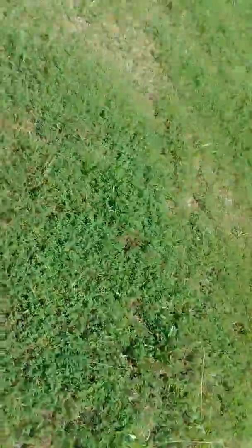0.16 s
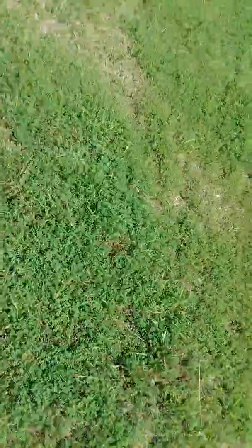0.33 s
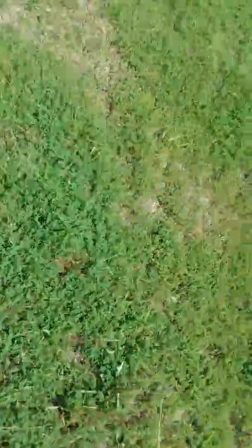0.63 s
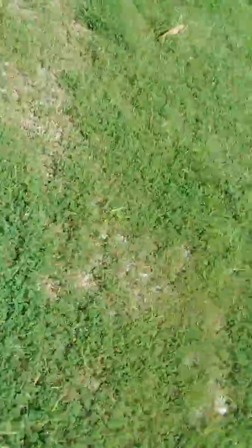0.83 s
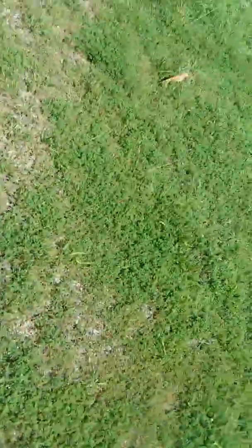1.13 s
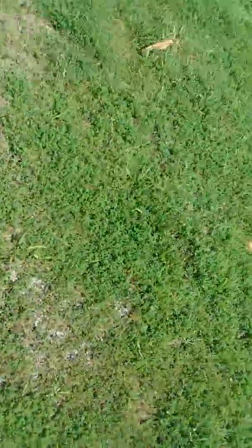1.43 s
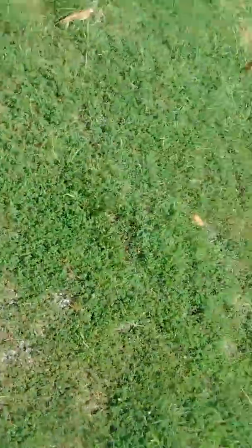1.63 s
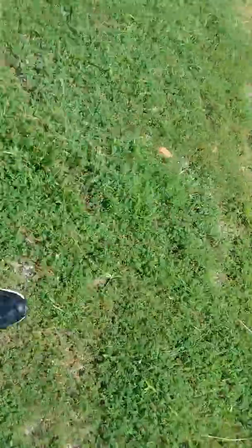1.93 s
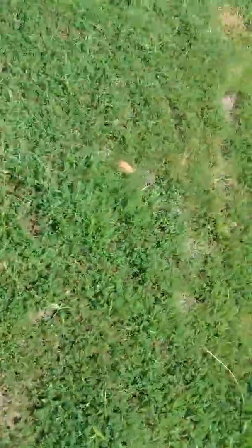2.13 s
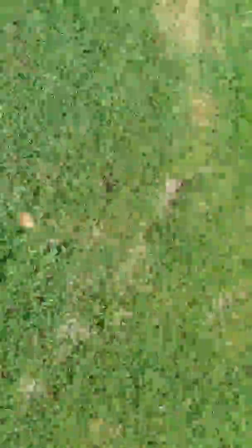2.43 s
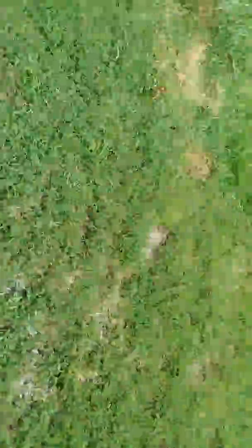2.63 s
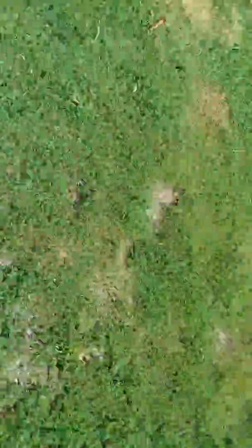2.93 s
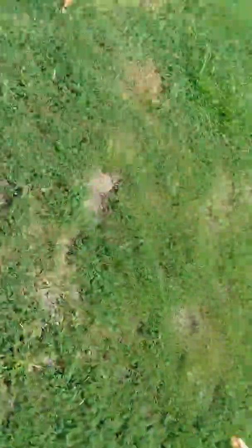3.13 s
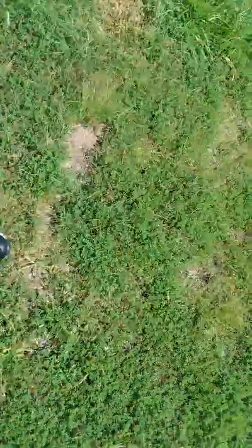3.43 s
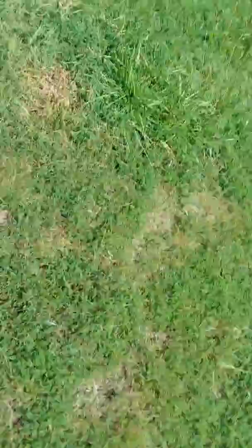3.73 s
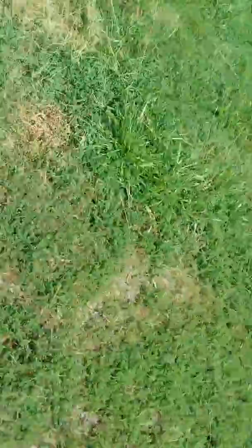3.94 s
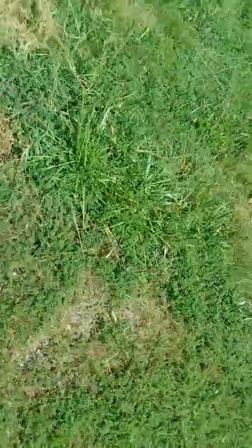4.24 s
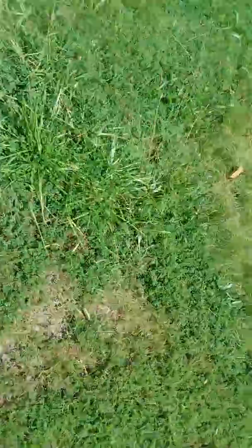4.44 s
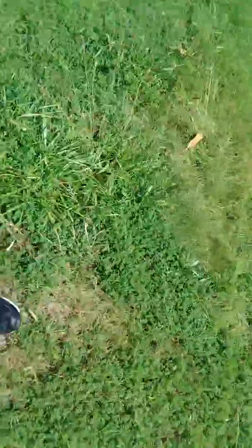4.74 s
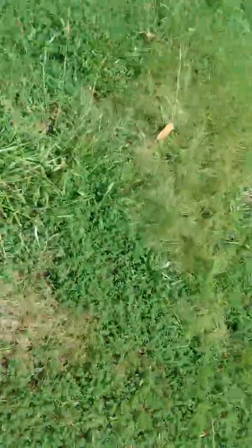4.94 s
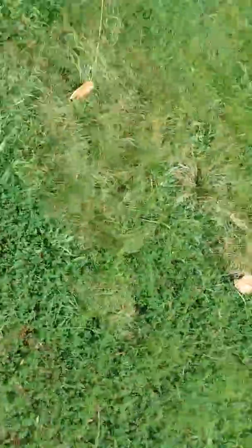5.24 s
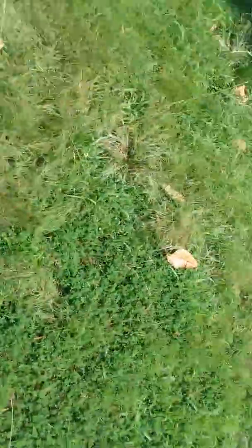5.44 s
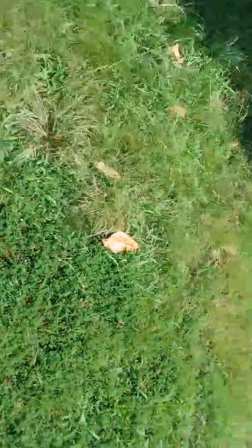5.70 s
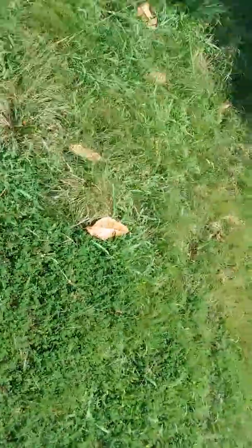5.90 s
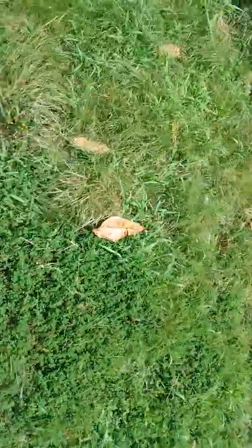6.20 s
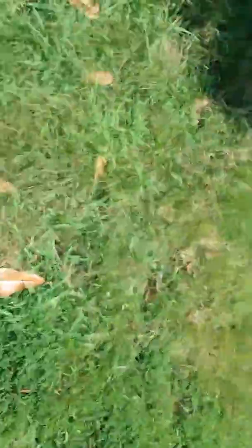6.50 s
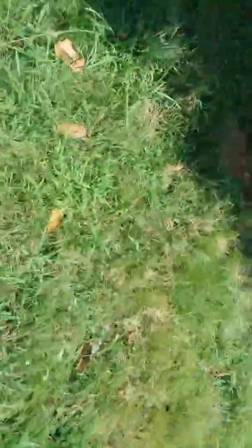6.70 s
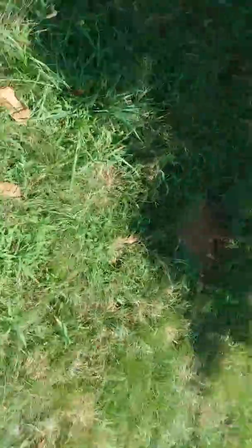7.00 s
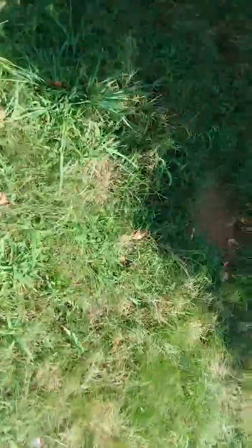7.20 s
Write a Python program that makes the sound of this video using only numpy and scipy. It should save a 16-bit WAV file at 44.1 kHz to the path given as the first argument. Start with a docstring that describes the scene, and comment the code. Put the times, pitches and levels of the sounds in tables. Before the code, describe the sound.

Outdoors on a lawn, slow footsteps crush turf and swish through blades, with small stem snaps. A near songbird on the right starts with buzzy chirps, then sings quick slurred motifs; a farther bird repeats short falling whistles. Very high insects trill throughout, and one rasps near the end. Soft bumps and low wind puffs hit the handheld microphone, mostly on the right.

```python
"""A soft bump and a puff of air rumble on a hand-held camera's microphone ports, louder on the right.
Slow steps cross a lawn: enveloped noise and fractures form the crush and swish, short pings the snaps.
A near songbird, louder on the right, sings pitch-swept tones; a farther one whistles falling notes.
Very high insects trill in pulsed tones over a blurred band of noise; one rasps louder towards the end.
Open air, a faint whine and two thin peeps lie behind."""
import sys
import numpy as np
from scipy import signal
from scipy.fft import rfft, irfft, next_fast_len
from scipy.io import wavfile
from scipy.ndimage import uniform_filter1d, map_coordinates

SR = 44100
rng = np.random.default_rng(int(sys.argv[2]) if len(sys.argv) > 2 else 0)


def transcribe(signal):
    """Save signal, clipped to [-1, 1], as a 16-bit WAV file at the path in sys.argv[1]."""
    frames = np.atleast_2d(signal).T
    limited = np.clip(frames, -1, 1)
    pcm = np.round(limited * 32767).astype(np.int16)
    wavfile.write(sys.argv[1], SR, pcm)


N = 324576

# Levels in the tables are relative: each source adds its own gain.

# open air: freq_hz, density_db_per_hz
AIR_SPECTRUM = [(25, -44), (60, 4.5), (120, 7.5), (250, -2), (500, -17.5), (1400, -20.5), (2300, -11),
                (3000, -13.5), (4200, -22), (6300, -37), (8500, -38), (12500, -30), (15800, -23)]
# steady far insect whine: freq_hz, density_db_per_hz
WHINE_SPECTRUM = [(4600, -18), (5350, -3.5), (5650, 2), (5950, -7.5), (6700, -40)]
# thin calls of a third bird: start_s, length_s, start_hz, middle_hz, end_hz, level_db
PEEPS = [(3.1, .04, 6500, 6150, 5800, -73), (4.327, .06, 4670, 4520, 4150, -70)]
# garden reverberation: freq_hz, t60_s
GARDEN_T60 = [(300, 0.29), (2500, 0.53), (10000, 0.12)]

# insect crowd blur: freq_hz, density_db_per_hz
CHORUS_SPECTRUM = [(8000, -43), (9000, -1), (9600, 1.5), (10200, 2), (10700, 0.5), (11300, -2),
                   (12000, -22)]
# insect crowd level: time_s, level_db
CROWD_LEVEL = [(0, -69.5), (2.3, -69.5), (3, -69.5), (4.5, -72), (5.5, -69.5), (7.36, -73.5)]
# even runs of insect chirps: centre_s (first chirp), count, period_s, pitch_hz, first_db, last_db
CHIRP_RUNS = [(.08, 13, .1885, 11150, -75, -71), (2.748, 5, .1925, 11150, -64, -62),
              (3.711, 5, .1985, 11170, -57, -58.5), (4.7, 13, .208, 11170, -68, -72),
              (.085, 7, .172, 10680, -63, -59), (1.37, 7, .18, 10660, -71, -61),
              (.13, 2, .19, 9500, -65, -62), (1.3, 4, .187, 9400, -68, -67),
              (2.29, 2, .209, 9450, -67, -63), (3.25, 2, .214, 9530, -64, -59),
              (3.78, 3, .18, 9450, -71, -66), (4.329, 2, .233, 9350, -61, -60.5),
              (5.27, 9, .236, 9420, -70, -67)]
# rasping insect: time_s, level_db, pulse_rate_hz
RASP_COURSE = [(0, -100, 15), (5.9, -95, 29), (6.35, -64.5, 27), (6.8, -60, 26), (7.36, -57.5, 18.3)]
# rasping insect's hiss: freq_hz, density_db_per_hz
RASP_SPECTRUM = [(4500, -20), (6300, -6.5), (7600, -5), (8600, -2), (9600, -25), (12000, -34)]

# far bird's whistles: start_s, level_db, pitch_shift_hz
FAR_WHISTLES = [(.01, -62, 86), (1.503, -65, 13), (1.723, -56, -15), (1.97, -56, -55), (2.236, -57, -53),
                (2.481, -57.5, -17), (2.73, -58, -35), (2.969, -55.5, 15), (3.229, -49, -10),
                (3.512, -48, 35), (3.792, -52, -30), (4.056, -50.5, 37), (4.311, -51.5, 35),
                (4.588, -51.5, 44), (4.954, -50.5, 219), (5.228, -53.5, 189)]
FALL_S, FALL_HZ = .052, (2297, 1953, 1736)  # length; start, middle, end pitch before the shift

# near bird's motif notes, seven tables: delay_s, length_s, start_hz, middle_hz, end_hz, level_db
SLUR = [(0, 0.0254, 3120, 2930, 2420, -54)]
LOOP = [(0, .011, 3550, 2950, 2800, -51.5), (.021, 0.023, 2397, 2550, 2870, -42.5),
        (.049, 0.0225, 2377, 2644, 2950, -51.5), (.075, 0.056, 2358, 2240, 2286, -50.5),
        (.122, .046, 2246, 2406, 2420, -40.5)]
HIGH_WHISTLE = [(0, .04, 3122, 3064, 2864, -47), (.028, 0.0615, 3107, 2908, 2750, -42.5)]
DOWN_UP = [(0, 0.012, 3215, 2970, 2800, -57.5), (.023, .02, 2352, 2635, 2870, -50.5)]
TWIRL = [(0, 0.0332, 3185, 2970, 2640, -48.5), (.032, 0.02, 3144, 3410, 3530, -58.5),
         (.061, .031, 2385, 2410, 2520, -50.5), (.097, .022, 3030, 2730, 2528, -49.5)]
SEESAW = [(0, 0.078, 2585, 2701, 2755, -52.5), (.07, .015, 2730, 2500, 2100, -55),
          (.104, .052, 1990, 2076, 2200, -56)]
CURL = [(0, .014, 2340, 2520, 2800, -48.5)]
# motifs, each with its calls: motif, calls of (start_s, first_note_gain_db, last_note_gain_db, pitch_shift_hz)
PHRASES = [(SLUR, [(.917, 2.5, 0, 0)]), (CURL, [(1.913, 0.5, 0, 0)]), (LOOP, [(1.604, -0.5, 3, 14),
           (1.989, 1, 2, -17), (2.394, 0.5, 2, -29.5)]), (HIGH_WHISTLE, [(1.808, -0.5, 0, 13),
           (2.217, -6.5, -4, -9), (2.61, 5, 2, 8.5)]), (DOWN_UP, [(2.885, -2.5, -4.5, 17),
           (3.145, 0.5, -1.5, 3), (3.422, 3, 1, -53), (3.687, -6, -2.5, -22), (3.976, 1.5, -2.5, 50),
           (4.229, -2, -8, -20), (4.507, 1.5, 1.5, 37)]), (TWIRL, [(4.825, 0, 1, 4.3),
           (5.093, 0.5, 0, 14)]), (SEESAW, [(5.385, 0.5, 1, -11), (5.639, -3, 1, -7), (5.877, -1, -4, 5.5),
           (6.141, -0.5, 1.5, -6), (6.92, 6.5, 1.5, 34), (7.173, 10, -1, 21)])]
# chirps tumbling into a buzz: start_s, buzz_delay_s, buzz_length_s, buzz_pitch_hz,
# opening_shift_hz, opening_gain_db, buzz_level_db
BUZZES = [(0.153, 0.041, .044, 2542, 220, -6.5, -42.5), (0.509, 0.044, 0.029, 2204, 63, 0.5, -51),
          (0.779, .044, 0.024, 2360, -4, 1.5, -47.5), (1.041, 0.041, 0.0177, 2330, -60, -3, -45.5),
          (1.331, 0.041, 0.054, 2320, 0, 1, -57.5)]
# notes opening each buzz: delay_s, length_s, start_hz, middle_hz, end_hz, level_db
OPENING = [(0, 0.0147, 3320, 3124, 2860, -50), (.02, .016, 3490, 3283, 3230, -53.5)]
TUMBLE_S, TUMBLE_HZ, TUMBLE_DB = .008, 3290, -47.5  # fall from the opening into the buzz
BUZZ_SAG_HZ, BUZZ_DEPTH_HZ = 149, 312

# gusts on the ports: peak_s, rise_s, fall_s, level_db; rise and fall each span 20 dB
GUSTS = [(.02, 0.07, 0.14, -45), (.3, 0.36, .09, -49), (.665, .2, 0.025, -38.5), (.79, 0.36, 0.26, -43.5),
         (1.06, .06, 0.17, -52), (1.41, 0.11, 0.25, -50), (1.68, 0.17, 0.11, -54), (2.195, 0.11, 0.19, -43),
         (2.41, 0.15, 0.16, -39.5), (2.68, 0.055, 0.099, -52), (3.05, .12, 0.24, -49.5),
         (3.68, 0.092, 0.18, -40), (3.89, 0.072, 0.086, -46.5), (4.12, .12, 0.082, -50.5),
         (4.57, 0.19, .16, -51), (5.24, 0.58, 0.32, -52), (5.62, .3, 0.081, -54), (5.815, 0.05, 0.076, -49),
         (5.96, 0.073, 0.086, -56), (6.35, 0.12, .15, -53), (6.66, .3, .35, -53), (7.15, 0.1, .12, -50)]
# gust rumble: freq_hz, density_db_per_hz
RUMBLE_SPECTRUM = [(20, -58), (35, -23), (55, -2.5), (80, 1), (140, 2), (240, -7.5), (330, -14), (480, -33),
                   (1500, -54)]
# soft bumps on the camera: start_s, pitch_hz, level_db
BUMPS = [(0.034, 96, -27), (0.157, 123, -25.5), (0.649, 204, -16.5), (0.663, 101, -34), (2.277, 184, -27.5),
         (2.364, 91, -36), (2.445, 90, -27), (2.982, 132, -30), (3.635, 85, -29.5), (3.696, 148, -27.5)]

# weight coming onto the turf: peak_s, rise_s, fall_s, level_db; rise and fall each span 20 dB
TREADS = [(.14, 0.079, 0.072, -64), (.303, 0.014, 0.04, -50.5), (.385, 0.076, 0.34, -58),
          (.645, 0.11, 0.06, -50), (.9, 0.35, 0.043, -59.5), (1.175, .17, 0.34, -53.5),
          (1.492, .1, 0.087, -59), (1.795, 0.14, .04, -55.5), (2.08, .042, 0.29, -47.5),
          (2.635, 0.24, 0.18, -52), (2.8, 0.13, 0.067, -55), (3.25, 0.1, 0.13, -49), (3.4, .16, 0.088, -55),
          (3.587, 0.2, .09, -52), (3.79, 0.35, 0.71, -62.5), (4.26, 0.15, 0.16, -52),
          (4.555, .03, .15, -58), (4.888, 0.026, 0.17, -52.5), (4.975, 0.082, 0.31, -54.5),
          (5.435, 0.18, .24, -48.5), (5.645, 0.19, 0.12, -56), (6.025, 0.018, 0.16, -51.5),
          (6.13, 0.087, .45, -54.5), (6.58, 0.1, 0.21, -56.5), (6.82, .22, 0.32, -54),
          (7.03, 0.096, 0.03, -49.5), (7.33, .4, 0.16, -55)]
# crushed turf: freq_hz, density_db_per_hz
TURF_SPECTRUM = [(120, -40), (280, -0.5), (600, 1.5), (1100, -1), (1500, -7.5), (2200, -4), (3200, -18.5),
                 (4500, -17), (9000, -61)]
# breaking stalks: freq_hz, density_db_per_hz
STALK_SPECTRUM = [(300, -25), (800, -4), (1300, -1), (3500, -6), (5000, -20), (9000, -32)]
# heels meeting the soil: start_s, pitch_hz, level_db
HEELS = [(1.501, 307, -40), (3.245, 312, -41), (3.886, 300, -43), (4.552, 317, -34), (4.879, 304, -39),
         (6.382, 327, -36)]
# stems snapping and shoes ticking: start_s, pitch_hz, level_db, pan_left_minus_right_db
SNAPS = [(.1258, 1100, -42, 0), (.3088, 975, -45, -12), (0.6221, 1210, -33.5, -2), (2.0574, 2114, -34, -10),
         (2.1524, 1230, -35, 4), (2.1972, 1110, -38, 7), (2.218, 1170, -46, 7), (2.309, 1200, -39, 4),
         (2.7787, 2550, -37.5, -20), (3.2202, 945, -32, -3), (3.244, 1260, -43, -13),
         (3.3863, 2300, -29, -6), (3.5698, 1700, -37, -8), (3.8902, 1320, -35.5, 2), (4.37, 7000, -45, -9),
         (4.5553, 960, -52, 16), (4.882, 1040, -43, -1), (5.0667, 1070, -37.5, -1), (5.436, 1640, -32, -5),
         (6.1048, 1690, -31.5, -9), (6.1393, 1450, -35.5, 1), (6.206, 686, -35.5, -1),
         (6.2605, 1060, -39, 1.5), (6.3846, 624, -35, 16), (6.8138, 1280, -33.5, -2),
         (7.2928, 880, -32.5, 5.5)]
# shoes sweeping the blades: peak_s, rise_s, fall_s, swish_db, dry_crackle_db; rise and fall span 20 dB
SWEEPS = [(.41, 0.16, 0.28, -63.5, -66.5), (.62, 0.2, 0.11, -67, -70), (.82, 0.063, 0.12, -65, -71),
          (1.09, 0.08, 0.32, -55.5, -59.5), (1.21, 0.16, 0.076, -56, -65), (1.495, 0.12, 0.041, -62, -77),
          (2.1, .14, 0.45, -66, -77), (2.585, .13, 0.25, -50.5, -53.5), (2.79, 0.19, 0.19, -59, -73),
          (3.27, 0.081, .3, -62, -64), (3.39, .04, 0.18, -59.5, -74), (3.568, 0.059, 0.079, -55.5, -62),
          (3.98, 0.21, 0.27, -58.5, -64), (4.09, 0.44, .2, -60.5, -67), (4.24, 0.11, 0.28, -57.5, -67),
          (4.86, 0.3, 0.43, -64.5, -73), (5.12, 0.084, .15, -73, -67), (5.365, 0.063, 0.26, -53.5, -48.5),
          (5.45, 0.2, 0.24, -51, -63), (5.633, .08, 0.29, -57.5, -60), (6.06, 0.15, 0.4, -57.5, -59),
          (6.125, 0.09, 0.26, -55, -61), (6.38, 0.27, 0.65, -62, -67), (6.72, 0.25, 0.12, -64, -61),
          (6.871, 0.32, 0.093, -49.5, -49.5), (7.02, 0.2, 0.17, -53, -56), (7.14, 0.064, 0.65, -61, -61),
          (7.34, 0.77, .2, -58, -67)]
# soft blades: freq_hz, density_db_per_hz
BLADE_SPECTRUM = [(700, -35), (1500, 1), (2700, 11), (4200, 0), (6000, -4), (8500, -1.5), (11000, -25),
                  (13000, -3.5), (16000, -33)]
# dry stems: freq_hz, density_db_per_hz
DRY_STEM_SPECTRUM = [(5000, -5), (9000, -1.5), (11500, -0.5), (13000, -1), (15800, -8.5)]

# relative levels between the swells
SWISH_REST_DB, DRY_REST_DB, CRUSH_REST_DB, GUST_REST_DB = -72, -75.5, -68, -64.5
STALKS_PER_S, STALK_DB = 30, -7  # break rate per channel; gain on the tread curve
TOP_HZ = 15827


def amp(db):
    """Decibels to gain."""
    return 10 ** (np.asarray(db) / 20)


def unit(x):
    """x at rms 1."""
    return x / np.sqrt(np.mean(x ** 2) + 1e-20)


def along(points, hz):
    """(Hz, value) points read on a log-frequency axis."""
    f, v = np.transpose(points)
    return np.interp(np.log(hz + 1), np.log(f + 1), v)


def curves(rows):
    """One value per sample for each column after the time."""
    s, *cols = np.transpose(rows)
    return [np.interp(np.arange(N) / SR, s, c) for c in cols]


def wobble(rate_hz):
    """A smooth random curve through rate_hz knots a second."""
    knots = rng.standard_normal(int(N * rate_hz / SR) + 4)
    return map_coordinates(knots, [np.arange(N) * rate_hz / SR])


def swells(rows, rest_db):
    """Level in dB: power sum of (peak_s, rise_s, fall_s, level_db) swells over a resting level."""
    t = np.arange(0, N, 32) / SR
    power = amp(rest_db) ** 2
    for s, rise_s, fall_s, db in rows:
        drop_db = 20 * np.maximum((s - t) / rise_s, (t - s) / fall_s)
        power = power + amp(db - drop_db) ** 2
    return np.interp(np.arange(N) / SR, t, 10 * np.log10(power))


def filtered(x, response):
    """x times a response of frequency."""
    m = next_fast_len(N + SR // 2)
    return irfft(rfft(x, m) * response(np.fft.rfftfreq(m, 1 / SR)), m)[..., :N]


def add(track, s, sound):
    """Mix a sound into a track at time s."""
    i = max(round(s * SR), 0)
    part = track[..., i:i + sound.shape[-1]]
    part += sound[..., :part.shape[-1]]


def panned(pan_db):
    """Left and right gains of joint rms 1; pan_db is left minus right."""
    return unit(amp([[pan_db / 2], [-pan_db / 2]]))


def ports(x, lead_s):
    """Inter-port delay: left leads right by lead_s; a negative lead puts right first."""
    sides = np.array([[1], [-1]])
    return filtered(x, lambda hz: np.exp(1j * np.pi * hz * lead_s * sides))


def spread(three, spectrum, alike, pan_db):
    """Coloured stereo pair at rms 1, then panned; alike is the power share common to both ears."""
    share = np.clip(alike, 0, 1)
    pair = np.sqrt(share) * three[0] + np.sqrt(1 - share) * three[1:]
    return unit(filtered(pair, lambda hz: amp(along(spectrum, hz)))) * panned(pan_db)


def noise():
    """Three unrelated white noises."""
    return rng.standard_normal((3, N))


def crackle(rate_hz, scatter_db, hiss):
    """Three streams of tiny fractures of uneven size over rubbing noise."""
    sizes = amp(scatter_db * np.clip(noise(), -2, 2)) * np.sign(noise())
    fractures = unit(sizes * (rng.random((3, N)) < rate_hz / SR))
    return fractures + hiss * noise()


def garden(x):
    """Diffuse stereo answer of trees and walls: noise decaying at a rate set per frequency."""
    hz, t, z = signal.stft(rng.standard_normal((2, SR // 2)), SR, nperseg=256)
    decay = amp(-60 * t / along(GARDEN_T60, hz)[:, None])
    tail = signal.istft(z * decay, SR, nperseg=256)[1]
    return signal.fftconvolve(x[None], tail / np.linalg.norm(tail[0]), axes=1)[:, :N]


def nearby(x, life_s):
    """Sparse quick reflections off the ground and the walker, different at each ear."""
    t = np.arange(SR // 16) / SR
    hits = rng.random((2, len(t))) < .02
    taps = rng.standard_normal((2, len(t))) * hits * np.exp(-t / life_s)
    taps = taps / np.linalg.norm(taps, axis=1, keepdims=True)
    return signal.fftconvolve(x[None], taps, axes=1)[:, :N]


def whistle(length_s, start_hz, middle_hz, end_hz, warble_hz,
            warble_rate_hz=92, edge_s=0.0006, overtone_db=-36):
    """One slurred note at rms near 1: a nearly pure tone on an arched pitch path."""
    t = np.arange(-SR // 400, int((length_s + edge_s) * SR)) / SR
    u = np.clip(t / length_s, 0, 1)
    # parabola through the start, middle and end pitch
    hz = start_hz * (1 - u) * (1 - 2 * u) + middle_hz * (2 * u) * (2 - 2 * u) + end_hz * u * (2 * u - 1)
    warble = warble_hz * np.sin(2 * np.pi * warble_rate_hz * t)
    phase = 2 * np.pi * np.cumsum(hz - warble) / SR
    edge = np.clip(np.minimum(t - t[0], t[-1] - t) / edge_s, 0, 1)
    gate = np.sin(np.pi / 2 * edge) ** 2
    swell = .45 + np.sin(np.pi * u ** 1.25)  # peaks a little after the middle
    tone = np.sin(phase) + amp(overtone_db) * np.sin(2 * phase)
    return unit(gate * swell) * unit(tone)


def open_air():
    """Broadband air noise with a slow random level."""
    return amp(-55.5 + 1.7 * wobble(3.18)) * spread(noise(), AIR_SPECTRUM, alike=0.52, pan_db=-2.0)


def insect_whine():
    """A far, steady insect whine: narrow-band noise, slightly uneven."""
    return amp(-76.5 + 1.6 * wobble(5)) * spread(noise(), WHINE_SPECTRUM, alike=0.14, pan_db=6)


def peeping_bird():
    """Thin falling tones heard only through close reflections."""
    peeps = np.zeros(N)
    for s, length_s, start_hz, middle_hz, end_hz, db in PEEPS:
        add(peeps, s, amp(db) * whistle(length_s, start_hz, middle_hz, end_hz, 0))
    return nearby(peeps, life_s=.01)


def chirp(hz, stroke_rate_hz=137, length_s=0.051, drop_hz=500, rasp_rad=0.09):
    """A short run of wing strokes, each with a fresh phase and a pitch falling by drop_hz."""
    t = np.arange(int(length_s * SR)) / SR
    stroke, part = np.divmod(stroke_rate_hz * t, 1)
    strokes = np.sin(np.pi * part) ** 2 * np.sin(np.pi * t / length_s) ** 0.58
    fresh = rng.random(size=32)[stroke.astype(int)]
    phase = 2 * np.pi * (np.cumsum(hz - drop_hz * (part - .5)) / SR + fresh)
    jitter = rasp_rad * unit(uniform_filter1d(rng.standard_normal(len(t)), size=40))
    return unit(strokes * np.sin(phase + jitter))


def insect_runs():
    """Near insects chirp in evenly timed runs with slightly random levels."""
    trill = np.zeros(N)
    for centre_s, count, period_s, hz, first_db, last_db in CHIRP_RUNS:
        for k, db in enumerate(np.linspace(first_db, last_db, count)):
            add(trill, centre_s + k * period_s - .028, amp(db + rng.normal(0, 1)) * chirp(hz))
    return trill


def insect_crowd(centre_hz=10250, mean_period_s=.19):
    """Six insects spread in pitch and place, each chirping at its own pace."""
    crowd = np.zeros((2, N))
    for pitch, (pace, lag, side) in zip(np.linspace(-1, 1, 6), rng.uniform(-1, 1, size=(6, 3))):
        for k, size in enumerate(rng.standard_normal(size=45)):
            s = mean_period_s * (abs(lag) + k * (1 + .12 * pace))
            add(crowd, s, amp(2 * size) * panned(4 * side) * chirp(centre_hz + 500 * pitch))
    return crowd


def insects():
    """Runs over a crowd; the farthest insects blur into a flickering noise band."""
    crowd_db, = curves(CROWD_LEVEL)
    blur_gain = amp(crowd_db + 6.0 + 3.3 * wobble(260))
    blur = blur_gain * spread(noise(), CHORUS_SPECTRUM, alike=0.097, pan_db=-6.0)
    trill = insect_runs()
    direct = ports(trill + amp(crowd_db - 2.5) * insect_crowd(), lead_s=2e-5)
    return amp(6) * panned(-12) * (direct + amp(-10) * garden(trill)) + blur


def rasping_insect(depth_db=5):
    """A hoarse pulsed hiss that grows as the walker draws near, its pulses slowing."""
    level_db, rate_hz = curves(RASP_COURSE)
    beat = np.sin(2 * np.pi * np.cumsum(rate_hz) / SR)
    return amp(level_db + depth_db * beat) * spread(noise(), RASP_SPECTRUM, alike=0.074, pan_db=-4)


def far_bird():
    """One falling whistle, repeated; each fades as it falls and is followed by an echo."""
    voice = np.zeros(N)
    for s, db, shift_hz in FAR_WHISTLES:
        note = whistle(FALL_S, *np.add(FALL_HZ, shift_hz), 0)
        note = amp(db) * unit(note * amp(-9 * np.linspace(0, 1, len(note))))
        add(voice, s, note)
        add(voice, s + .047, amp(-7.5) * note)
    voice = voice * amp(2.3 * wobble(150))
    around = amp(-11) * nearby(voice, life_s=.012) + amp(-14) * garden(voice)
    return amp(0.5) * panned(-2.7) * (ports(voice, lead_s=0.00011) + around)


def motif(notes, first_db, last_db, shift_hz):
    """A run of slurred notes, shifted in pitch, with a gain ramp from first to last."""
    out = np.zeros(SR // 4)
    gains_db = np.linspace(first_db, last_db, len(notes))
    for (delay_s, length_s, start_hz, middle_hz, end_hz, db), gain_db in zip(notes, gains_db):
        path_hz = (start_hz + shift_hz, middle_hz + shift_hz, end_hz + shift_hz)
        note = whistle(length_s, *path_hz, 0, overtone_db=-43.5)
        add(out, delay_s, amp(db + gain_db) * note)
    return out


def buzz_chirps():
    """Opening notes tumble in pitch into a rapidly frequency-modulated buzz."""
    voice = np.zeros(N)
    for s, delay_s, length_s, hz, shift_hz, opening_db, db in BUZZES:
        tumble = whistle(TUMBLE_S, TUMBLE_HZ, (TUMBLE_HZ + hz) / 2, hz, 0)
        buzz = whistle(length_s, hz + BUZZ_SAG_HZ, hz, hz - BUZZ_SAG_HZ, BUZZ_DEPTH_HZ, warble_rate_hz=110)
        add(voice, s, motif(OPENING, opening_db, opening_db, shift_hz))
        add(voice, s + delay_s - TUMBLE_S, amp(TUMBLE_DB + opening_db) * tumble)
        add(voice, s + delay_s, amp(db) * buzz)
    return voice


def near_bird():
    """Buzzing chirps and motifs, most of them repeated, with reflections and a garden tail."""
    voice = buzz_chirps()
    for notes, calls in PHRASES:
        for s, first_db, last_db, shift_hz in calls:
            add(voice, s, motif(notes, first_db, last_db, shift_hz))
    voice = voice * amp(2.1 * wobble(220))
    around = amp(-8) * nearby(voice, life_s=.011) + amp(-12.5) * garden(voice)
    return amp(6) * panned(-10) * (ports(voice, lead_s=1e-4) + around)


def port_gusts():
    """Moving air buffets the ports: low noise in lumpy swells, louder on the right."""
    gust_db = swells(GUSTS, GUST_REST_DB) + 1.5 + 2.5 * wobble(28)
    return amp(gust_db) * spread(noise(), RUMBLE_SPECTRUM, alike=0.13, pan_db=-10)


def hand_bumps():
    """Soft bumps of the hand: heavily damped low sines, mostly on the right."""
    bumps, t = np.zeros(N), np.arange(SR // 8) / SR
    for s, hz, db in BUMPS:
        cycles = hz * t / 1.1
        envelope = cycles ** 2 * np.exp(2 - 2 * cycles)
        add(bumps, s, amp(db) * envelope * np.sin(2 * np.pi * hz * t))
    bumps = signal.sosfilt(signal.butter(2, 60, "high", fs=SR, output="sos"), bumps)
    return amp(-6.0) * panned(-17) * bumps


def stalks(life_s=0.00076):
    """Single stalks break at random, louder where weight bears on the turf."""
    breaks = crackle(rate_hz=STALKS_PER_S, scatter_db=3, hiss=0)
    t = np.arange(SR // 200) / SR
    burst = rng.standard_normal((3, len(t))) * np.exp(-t / life_s)
    breaks = signal.fftconvolve(breaks, burst, axes=1)[:, :N]
    gain = amp(swells(TREADS, CRUSH_REST_DB) + STALK_DB)
    return gain * spread(breaks, STALK_SPECTRUM, alike=0.45, pan_db=-1)


def heels(life_s=0.0043):
    """A dull knock of packed earth: a damped sine gone in a few cycles."""
    out, t = np.zeros(N), np.arange(SR // 16) / SR
    for s, hz, db in HEELS:
        add(out, s, amp(db) * np.sin(2 * np.pi * hz * t) * np.exp(-t / life_s))
    return out


def snaps(ring_s=0.00098, rustle_s=0.0038):
    """A snap is a briefly ringing damped sine with a burst of fibre noise."""
    out, t = np.zeros((2, N)), np.arange(SR // 25) / SR
    for s, hz, db, pan_db in SNAPS:
        band_hz = [hz / 2, min(hz * 1.73, SR / 2 - 1)]
        band = signal.butter(2, band_hz, "band", fs=SR, output="sos")
        fibres = unit(signal.sosfilt(band, rng.standard_normal(len(t)))) * np.exp(-t / rustle_s)
        ping = np.sin(2 * np.pi * hz * t) * np.exp(-t / ring_s) * (1 - np.exp(-4 * hz * t))
        add(out, s, amp(db) * panned(pan_db) * (1.25 * ping + .35 * fibres))
    return ports(out, lead_s=-0.000086)


def blade_ticks(rate_hz=55, life_s=0.0033):
    """Single blades flick free of the shoe: random decaying noise bursts of uneven size."""
    flicks = (rng.random((3, N)) < rate_hz / SR) * amp(4 * np.clip(noise(), -2, 2))
    t = np.arange(SR // 100) / SR
    burst = rng.standard_normal((3, len(t))) * np.exp(-t / life_s)
    ticks = signal.fftconvolve(flicks, burst, axes=1)[:, :N]
    return spread(ticks, BLADE_SPECTRUM, alike=0.11, pan_db=-23.5)


def shoe_sweeps():
    """Toes sweep through soft blades and dry stems, catching unevenly."""
    catch_db = 1.3 * wobble(35)
    swish_rows = [(s, rise_s, fall_s, db) for s, rise_s, fall_s, db, _ in SWEEPS]
    dry_rows = [(s, rise_s, fall_s, db) for s, rise_s, fall_s, _, db in SWEEPS]
    swish_db = swells(swish_rows, SWISH_REST_DB) + catch_db
    dry_db = swells(dry_rows, DRY_REST_DB) + catch_db
    grains = crackle(rate_hz=1300, scatter_db=6, hiss=.5)
    swish = amp(swish_db + 5.0) * spread(grains, BLADE_SPECTRUM, alike=0.26, pan_db=-12.5)
    ticks = amp(swish_db - 3) * blade_ticks()
    brittle = crackle(rate_hz=900, scatter_db=5, hiss=.55)
    stems = amp(dry_db + 6.0) * spread(brittle, DRY_STEM_SPECTRUM, alike=0.13, pan_db=-5.5)
    return swish + ticks + stems


def turf_crush():
    """Soles crush the turf: dense fractures and rubbing noise follow the weight."""
    crush_db = swells(TREADS, CRUSH_REST_DB) + 1.0 + 2.54 * wobble(90)
    grains = crackle(rate_hz=900, scatter_db=4.5, hiss=0.89)
    crush = amp(crush_db) * spread(grains, TURF_SPECTRUM, alike=0.89, pan_db=1.5)
    return ports(crush, lead_s=-0.00012)


def scene():
    """The walk, the birds and the insects over the quiet open air."""
    distance = open_air() + insect_whine() + peeping_bird()
    animals = insects() + rasping_insect() + far_bird() + near_bird()
    handling = port_gusts() + hand_bumps()
    walk = stalks() + heels() + snaps() + shoe_sweeps() + turf_crush()
    return distance + animals + handling + walk


def record(dry):
    """The camera keeps nothing above its band limit."""
    return filtered(dry, lambda hz: hz < TOP_HZ)


dry = scene()
out = record(dry)
transcribe(out)
```